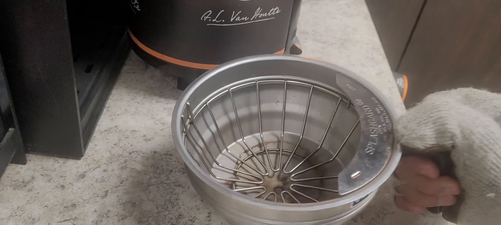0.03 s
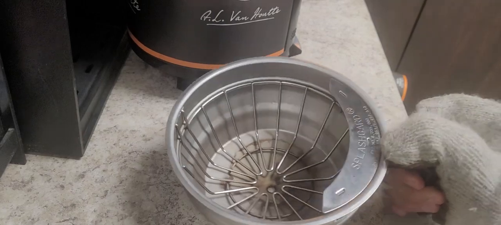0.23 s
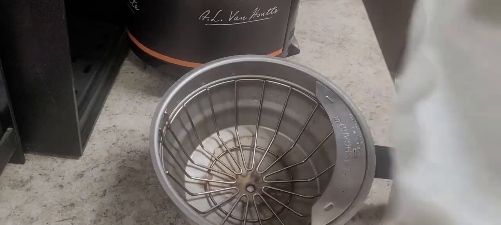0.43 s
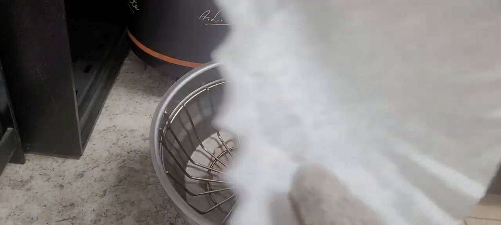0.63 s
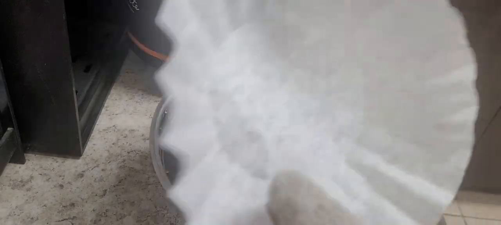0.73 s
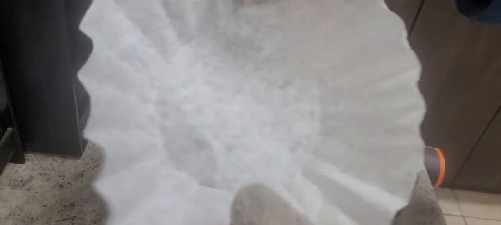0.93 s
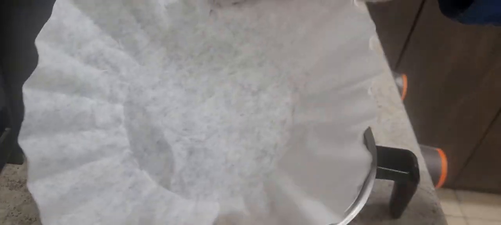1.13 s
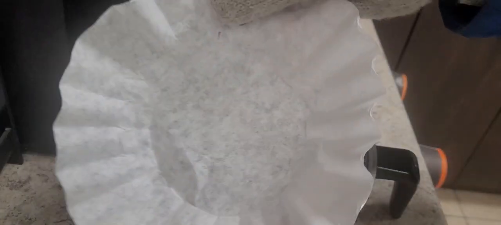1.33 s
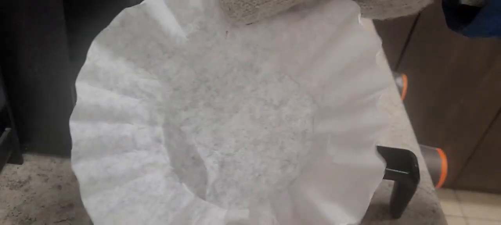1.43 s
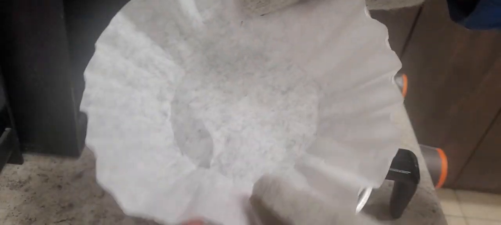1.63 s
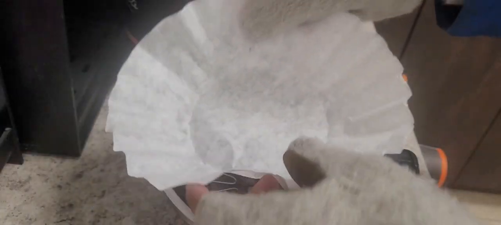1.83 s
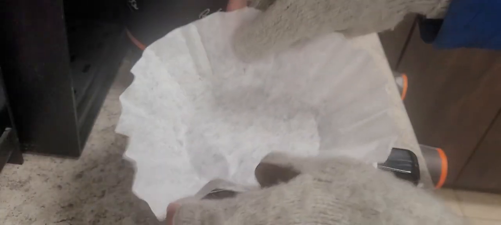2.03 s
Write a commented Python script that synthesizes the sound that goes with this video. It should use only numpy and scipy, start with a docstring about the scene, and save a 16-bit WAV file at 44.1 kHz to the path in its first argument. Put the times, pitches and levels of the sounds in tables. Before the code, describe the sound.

Four rapid clacks sound as a metal wire basket lands on a kitchen counter, thumping and briefly ringing. Close to the microphone, a paper filter pops open, snaps again more softly and faintly rustles. An appliance hums throughout.

```python
"""An appliance hums in a small, quiet kitchen from start to end.
Almost at once a steel filter basket is set down on the counter in four quick clacks. Each one thumps
the counter and rings the bowl, rim and wires; the first two also make the cupboard boom faintly.
Just before half a second a paper filter snaps open close by. It gives one softer snap,
then rustles faintly as it is held over the basket."""
import sys
import numpy as np
from scipy import signal
from scipy.fft import rfft, irfft, next_fast_len
from scipy.io import wavfile
from scipy.ndimage import map_coordinates

SR = 44100
rng = np.random.default_rng(int(sys.argv[2]) if len(sys.argv) > 2 else 0)


def to_wav(s):
    """Save 16-bit WAV."""
    ch = np.atleast_2d(s).T  # columns
    pcm = np.round(np.clip(ch, -1, 1) * 32767)  # PCM
    wavfile.write(sys.argv[1], SR, pcm.astype(np.int16))


N = 92610

# how alike the left and right sides of a noise are (frequency [Hz], likeness [0 to 1])
LIKENESS = [(25, 1), (70, .95), (130, 1), (250, 0.66), (500, 1), (1000, 0.095), (3000, 0.071),
            (12000, 0.068)]
# how long the room echoes (frequency [Hz], time to fade by 60 dB [s])
ECHO_TIMES = [(100, 0.46), (260, 0.37), (1000, 0.24), (4000, 0.32), (14000, 0.069)]
# tone colour of the rushing air (frequency [Hz], relative level [dB])
AIR_COLOUR = [(20, -26), (45, -10.5), (90, -5), (135, 9.5), (185, -7), (250, 2.5), (330, 1.5), (450, -5),
              (750, -10), (1200, -15.5), (2000, -19), (4000, -31.5), (8000, -36.5), (16000, -51)]
# the appliance's mains and motor tones (frequency [Hz], average level [dB])
HUM_TONES = [(59.5, -52), (120, -44.5), (130.5, -42), (338, -47), (409, -54.5), (1231, -59.5), (1347, -61)]
# how loud the paper rustles (time [s], level [dB])
RUSTLE_LEVELS = [(0, -57.5), (.44, -55), (.48, -45.5), (.55, -49.5), (.63, -63), (.76, -57), (1.25, -58),
                 (1.42, -61.5), (1.55, -56), (1.76, -53), (1.89, -58.5), (1.98, -52.5), (2.1, -53.5)]
# tone colours of the paper's rustle and crackle (frequency [Hz], relative level [dB])
HISS_COLOUR = [(300, 12), (1500, -3), (4000, 0.5), (6500, -5), (11500, 1), (16000, -1.5)]
CRACKLE_COLOUR = [(200, -29), (600, -7), (950, 0), (1300, -20), (1700, -4), (2600, -10), (5000, -17),
                  (6500, -25.5), (16000, -21)]
# paper snaps (time [s], crackle level [dB], fade time [s], brightness [dB per octave], pop level [dB])
PAPER_SNAPS = [(0.4620, -25.5, 0.022, 0, -14), (0.4651, -21, 0.014, 3, -29),
               (0.765, -34.5, 0.038, -3.5, -39)]
# tones of the paper's pop (frequency [Hz], relative level [dB], fade time [s])
POP_TONES = [(602, -9.5, 0.032), (950, -0.5, 0.013), (1600, -5.5, 0.018), (1924, -6.5, 0.016),
             (3230, -14, .012), (5050, -12, .012)]
# tones of the bowl, and of the rim and wires (frequency [Hz], relative level [dB], free fade time [s])
BOWL_TONES = [(548, -5, .3), (619, -8, .25), (665, -3, .05), (722, -4, .22), (760, -3, .04),
              (808, -11, .22), (860, -9, .06), (1250, -14, .06), (1570, -12, .08)]
RIM_TONES = [(1822, -4, .55), (1926, 1, .16), (1986, -3, .36), (2048, -7, .36), (2095, -4, .75),
             (2125, -2, .12), (2200, -5, .14), (2274, 1, .2), (2338, -4, .26), (2470, -8, .16),
             (3115, -11, .26), (3230, -8, .2), (4185, -3, .17), (4324, -2, .16), (7900, -11, .12),
             (11520, -13, .22), (13220, -14, .2)]
# tone colours of the steel's clack, bowl's knock and wires' sizzle (frequency [Hz], relative level [dB])
STEEL_COLOUR = [(150, -24), (500, 8.5), (1000, -0.5), (1500, -1), (2100, 11), (2800, -5.5), (4300, -5),
                (6000, -9.5), (9000, -26), (16000, -38)]
BOWL_COLOUR = [(250, -13.5), (550, 0), (750, 9.5), (1000, -10), (1550, -5.5), (2200, -43), (6000, -44)]
WIRE_COLOUR = [(1000, -35), (3000, 6), (6500, -7), (7800, 1), (9000, -1.5), (11500, 4.5), (13500, 3),
               (16000, -6)]
# the basket's hits on the counter (time [s], thump [dB], bowl [dB], rim [dB], clack [dB], sizzle [dB],
# sizzle fade time [s], bounce delay [s], bounce against hit [dB], bounce's sizzle against hit's [dB])
HITS = [(0.142, -2.5, -29, -34, -23.5, -22, 0.068, .0145, -13.5, -6),
        (0.1912, -6.5, -32.5, -38.5, -28.5, -27, 0.072, .018, -8, -18),
        (0.2926, -4.5, -19.5, -37.5, -28, -28, 0.05, .0175, -9.5, -12),
        (0.3472, -10, -31.5, -47, -34.5, -32.5, 0.056, .0135, 1.5, -23)]

METAL_RISE_S = 0.00038
SIDES = np.array([[1], [-1]])  # left, right


def amp(db):
    """Turn decibels into a number to multiply by."""
    return 10 ** (np.asarray(db) / 20)


def unit(x):
    """Scale a sound to an average (rms) size of 1."""
    return x / np.sqrt(np.mean(x ** 2) + 1e-20)


def along(points, hz):
    """Read between a table's rows, with octaves evenly spaced."""
    freqs, values = np.transpose(points)
    return np.interp(np.log(hz + 1), np.log(freqs + 1), values)


def since(s):
    """Seconds since time s, zero before it."""
    return np.maximum(np.arange(N) / SR - s, 0)


def strike(t, rise, fade):
    """A rise, then a fall of 60 dB every `fade` seconds."""
    return (1 - np.exp(-t / rise)) * amp(-60 * t / fade)


def wobble(rate):
    """A smooth curve through `rate` random values a second."""
    return map_coordinates(rng.standard_normal(64), [np.arange(N) * rate / SR], mode="mirror")


def pan(x, db):
    """Make the left side louder than the right by db."""
    return x * amp(db / 2 * SIDES)


def filtered(x, response):
    """Multiply each frequency in x by response(hz)."""
    size = next_fast_len(N + SR // 2)
    return irfft(rfft(x, size) * response(np.fft.rfftfreq(size, 1 / SR)), size)[..., :N]


def noise(colour, tilt_db=0):
    """Stereo noise, nearly the same on both sides in the bass and wide in the treble."""
    def response(hz):
        width = np.arccos(np.clip(along(LIKENESS, hz), -1, 1)) / 2
        gain = amp(along(colour, hz) + tilt_db * np.log2(hz + 1))
        return gain * [np.cos(width), np.sin(width)]
    mid, side = filtered(rng.standard_normal((2, N)), response)
    return unit(np.array([mid + side, mid - side]))


def ring(tones, t, held=1, scatter_db=2.9, spread=0.8):
    """A struck object's fading tones; `held` is the share of ring time a holding hand leaves."""
    out = np.zeros((2, N))
    for k, (hz, db, fade) in enumerate(tones):
        phase = np.pi * k + spread * rng.standard_normal((2, 1))  # left and right are out of step
        gain = amp(db + scatter_db * rng.standard_normal())
        out += gain * strike(t, METAL_RISE_S, fade * held) * np.sin(2 * np.pi * hz * t + phase)
    return out


def room_echo(x, delay_s=0.009):
    """The kitchen's blurred echo, with the same energy as the sound."""
    hiss = noise([(1, 0), (SR, 0)])[:, :SR // 2]
    hz, t, bands = signal.stft(hiss, SR, nperseg=256)
    fading = amp(-60 * t / along(ECHO_TIMES, hz)[:, None])
    tail = signal.istft(bands * fading, SR, nperseg=256)[1]
    echo = signal.fftconvolve(x, tail, axes=1)[:, :N]
    delayed = filtered(echo, lambda f: np.exp(-2j * np.pi * f * delay_s))
    return unit(delayed) * np.sqrt(np.mean(x ** 2))


def appliance(air_db=-36.5, waver_db=2.5, drift_rad=0.8, left_lag_s=0.00026):
    """Wavering mains and motor tones over a low rush of air, coming from the right."""
    out = amp(air_db) * noise(AIR_COLOUR)
    for hz, db in HUM_TONES:
        phase = 2 * np.pi * (hz * since(0) + rng.random()) + drift_rad * wobble(11)
        out += np.sqrt(2) * amp(db + waver_db * wobble(8.73)) * np.sin(phase)
    placed = filtered(out, lambda hz: np.exp(-1j * np.pi * hz * left_lag_s * SIDES))
    return pan(placed, db=-0.26)


def paper(rise_s=0.00035, flutter_db=1):
    """The paper's folds hiss faintly as they slide, and pop and crackle as they open."""
    level_db = np.interp(since(0), *np.transpose(RUSTLE_LEVELS)) + flutter_db * wobble(26.3)
    out = amp(level_db) * pan(noise(HISS_COLOUR), db=-2)
    for s, crackle_db, fade, tilt_db, pop_db in PAPER_SNAPS:
        out += amp(crackle_db) * strike(since(s), rise_s, fade) * noise(CRACKLE_COLOUR, tilt_db)
        out += amp(pop_db) * ring(POP_TONES, since(s), spread=0.78)
    return out


def cupboard(hz=59.5, gain_db=-16):
    """The first two hits carry the weight and make the cupboard under the counter boom faintly."""
    clocks = [since(hit[0]) for hit in HITS[:2]]
    booms = [strike(t, rise=0.081, fade=0.25) * np.sin(2 * np.pi * hz * t) for t in clocks]
    return amp(gain_db) * sum(booms)


def counter(s, thump_hz=255.8, bend_hz=162.2, bend_db=-17, left_lag_s=0.00006):
    """A thump that dies within a few swings, over the worktop's slower bending."""
    t = np.array([since(s + left_lag_s / 2), since(s - left_lag_s / 2)])
    swell = lambda rise_s: t / rise_s * np.exp(1 - t / rise_s)
    thump = swell(rise_s=0.0049) ** 3.76 * np.sin(2 * np.pi * thump_hz * t)
    bend = amp(bend_db) * swell(rise_s=0.0081) * np.sin(2 * np.pi * bend_hz * t)
    return -(thump + bend)


def wires(colour, peaks, spacing_hz=109.7, ripple_db=3):
    """The wires' many short-lived tones, made as noise with peaks and dips across its frequencies."""
    def ripple(hz):
        bumps = map_coordinates(peaks, [hz / spacing_hz], mode="mirror")
        return amp(ripple_db * np.clip(hz / 3000, 0, 1) * bumps)
    return unit(filtered(noise(colour), ripple))


def bounced(s, gap_s, bounce_db, fade, rise=METAL_RISE_S):
    """The loudness curve of a hit and its bounce, with their energies added."""
    return np.hypot(strike(since(s), rise, fade), amp(bounce_db) * strike(since(s + gap_s), rise, fade))


def basket(bowl_held=0.91, rim_held=0.67, sizzle_lag_s=0.00076, thump_echo_db=-6.5, metal_echo_db=-8.5):
    """Each hit thumps the counter, rings the steel and sizzles the wires, then bounces once."""
    out = np.zeros((2, N))
    peaks = rng.standard_normal(256)  # the same wires sound in every hit
    for hit in HITS:
        s, thump_db, bowl_db, rim_db, clack_db, sizzle_db = hit[:6]
        sizzle_fade, gap_s, bounce_db, resizzle_db = hit[6:]
        thump = amp(thump_db) * (counter(s) + amp(bounce_db - 1) * counter(s + gap_s))
        bowl = ring(BOWL_TONES, since(s), bowl_held)
        bowl += amp(bounce_db) * ring(BOWL_TONES, since(s + gap_s), bowl_held)
        rim = ring(RIM_TONES, since(s), rim_held)
        ringing = amp(bowl_db) * bowl + amp(rim_db) * rim

        clack = bounced(s, gap_s, bounce_db, fade=0.12) * wires(STEEL_COLOUR, peaks)
        knock = bounced(s, gap_s, bounce_db, fade=0.078) * noise(BOWL_COLOUR)
        sizzle = bounced(s + sizzle_lag_s, gap_s, resizzle_db, sizzle_fade, rise=0.0024)
        sizzle = sizzle * wires(WIRE_COLOUR, peaks)
        clatter = amp(clack_db) * clack + amp(bowl_db + 1.5) * knock + amp(sizzle_db) * sizzle

        out += pan(thump, db=2) + pan(ringing + clatter, db=1.5)
        out += amp(thump_echo_db) * room_echo(thump) + amp(metal_echo_db) * room_echo(clatter)
    return out


def scene():
    """Add up the basket, cupboard, paper and appliance."""
    return basket() + cupboard() + paper() + appliance()


def record(dry, top_hz=15900):
    """Cut away the very highest treble."""
    return filtered(dry, lambda hz: np.clip((top_hz - hz) / 200 + .5, 0, 1))


dry = scene()
out = record(dry)
to_wav(out)
```